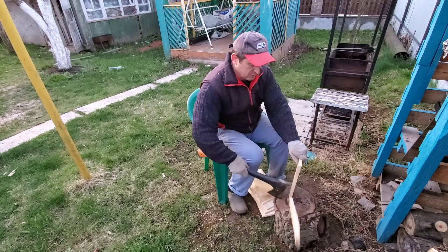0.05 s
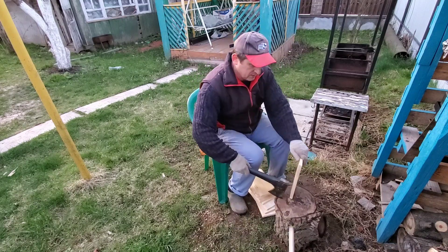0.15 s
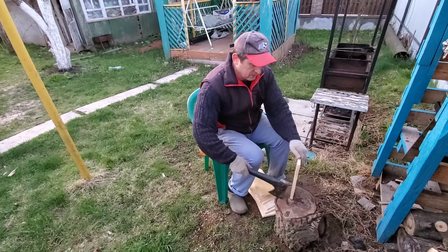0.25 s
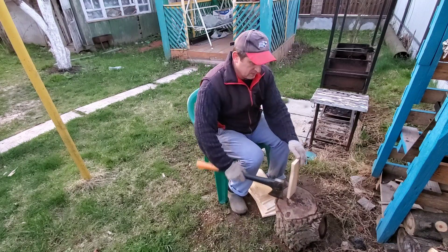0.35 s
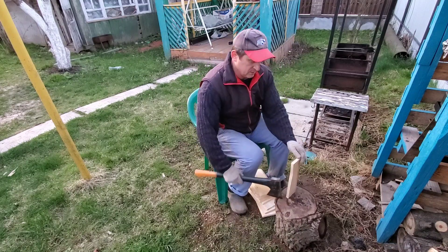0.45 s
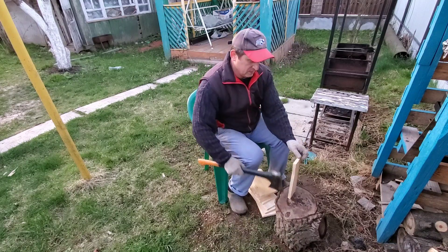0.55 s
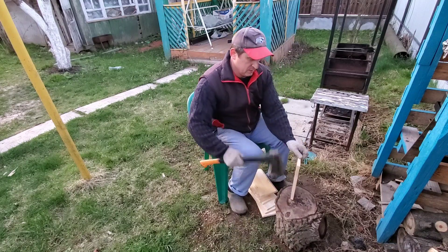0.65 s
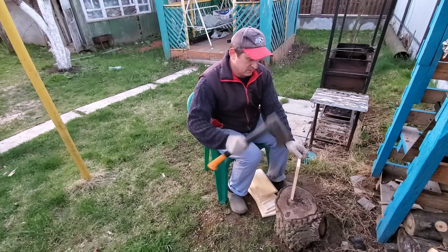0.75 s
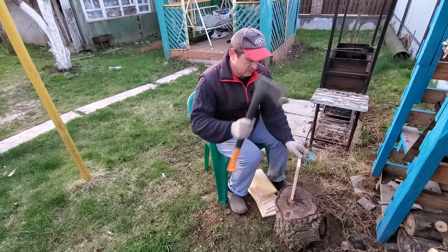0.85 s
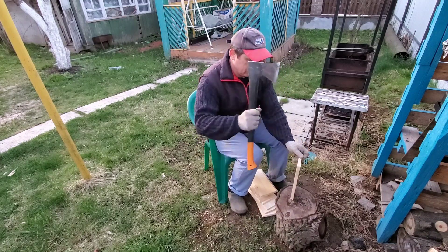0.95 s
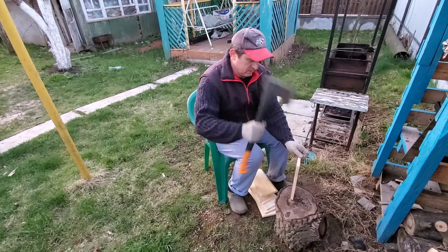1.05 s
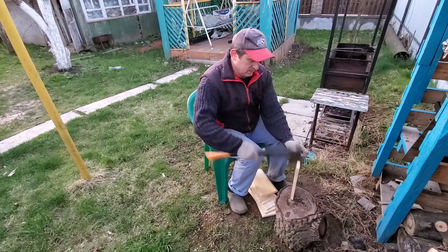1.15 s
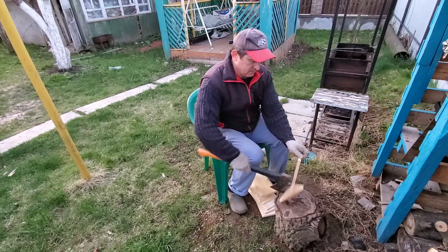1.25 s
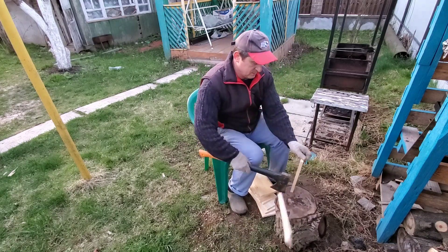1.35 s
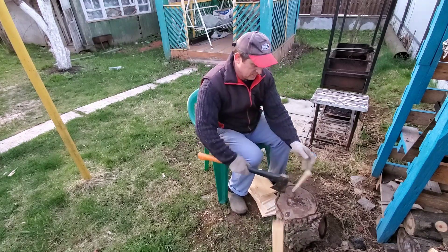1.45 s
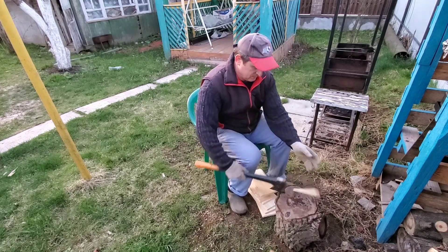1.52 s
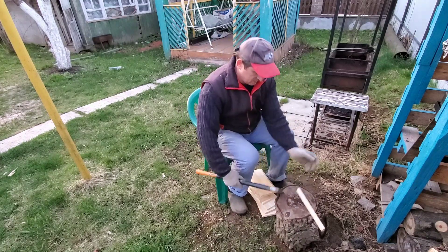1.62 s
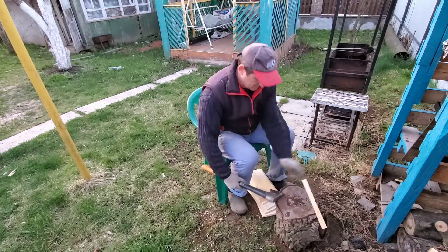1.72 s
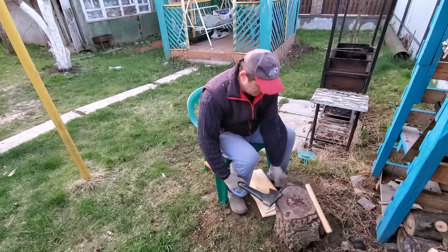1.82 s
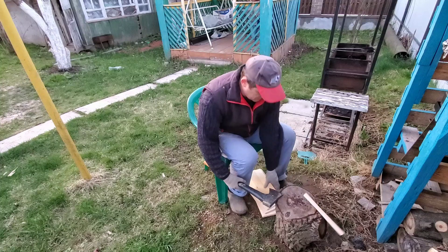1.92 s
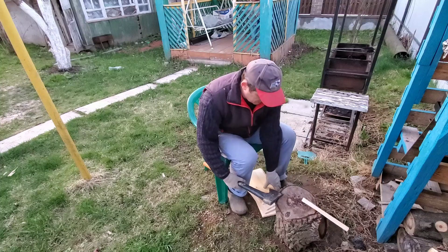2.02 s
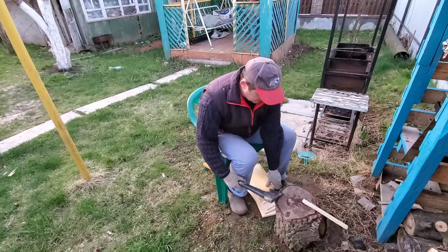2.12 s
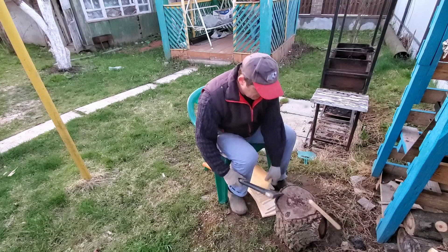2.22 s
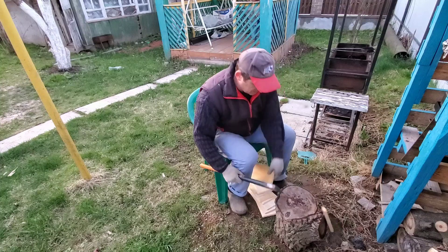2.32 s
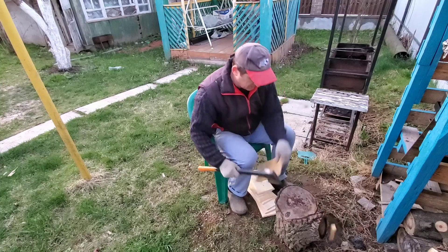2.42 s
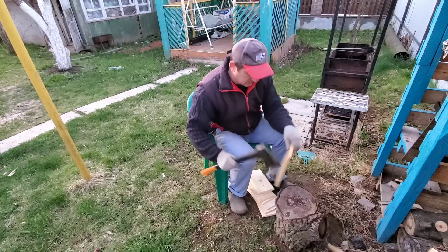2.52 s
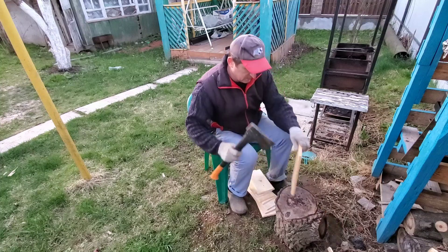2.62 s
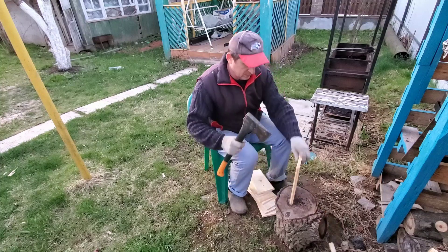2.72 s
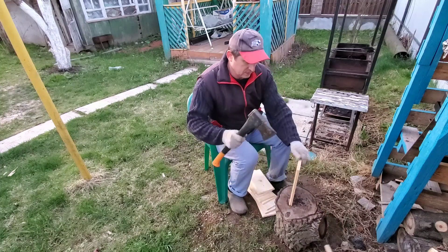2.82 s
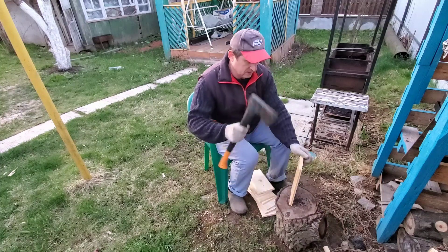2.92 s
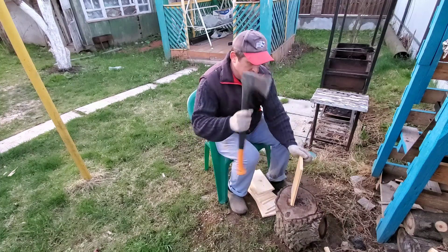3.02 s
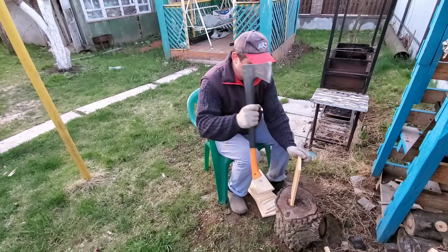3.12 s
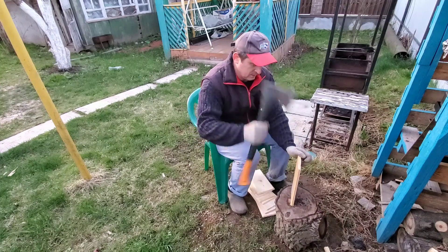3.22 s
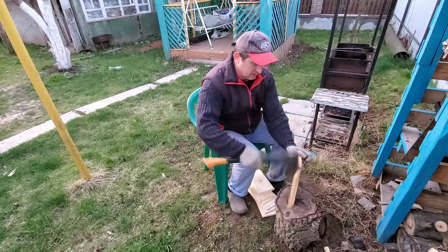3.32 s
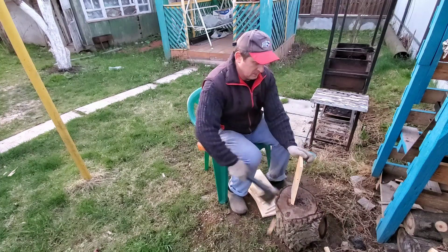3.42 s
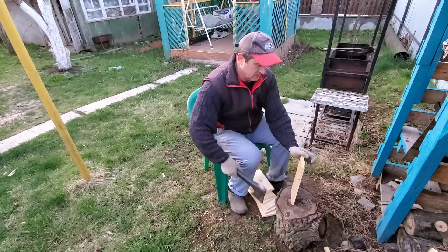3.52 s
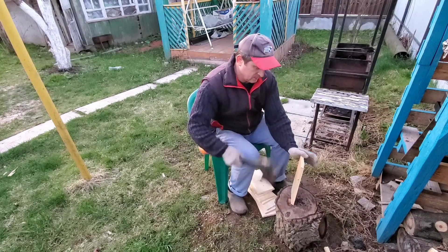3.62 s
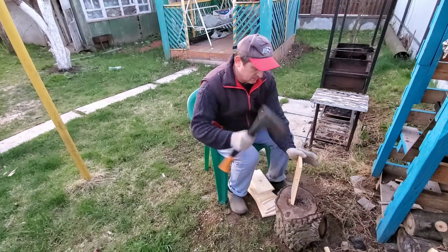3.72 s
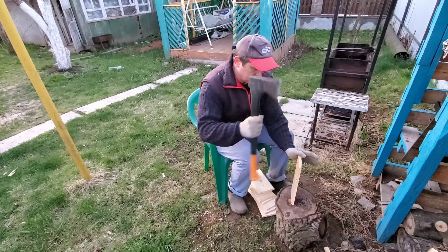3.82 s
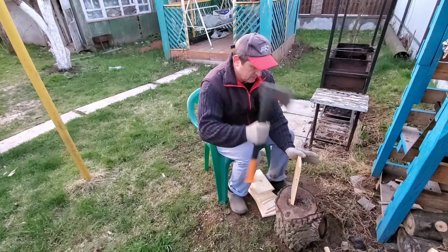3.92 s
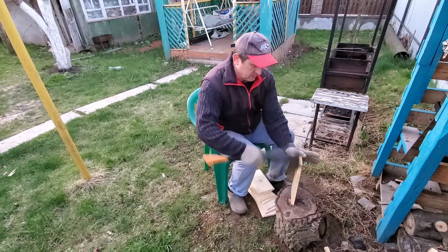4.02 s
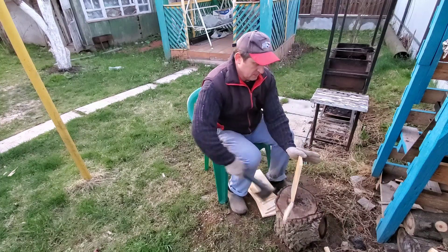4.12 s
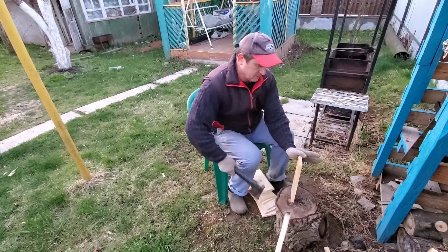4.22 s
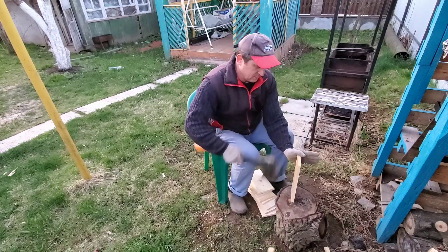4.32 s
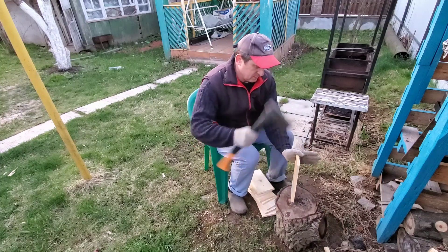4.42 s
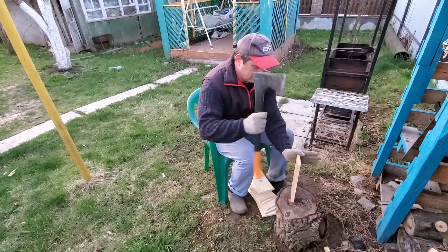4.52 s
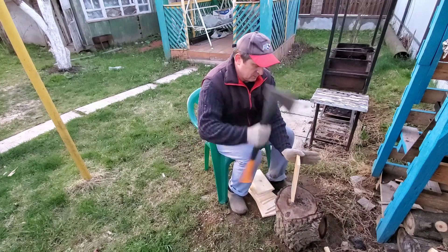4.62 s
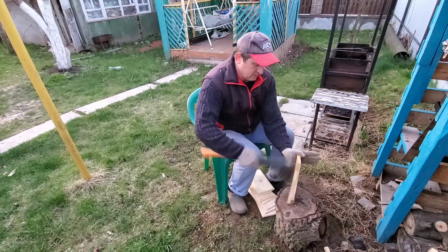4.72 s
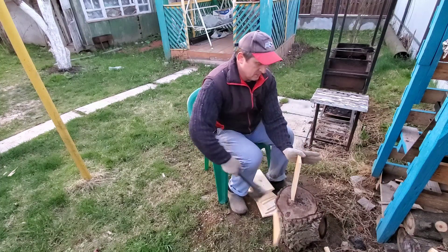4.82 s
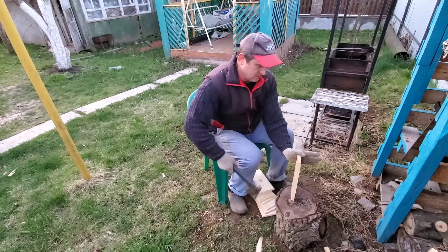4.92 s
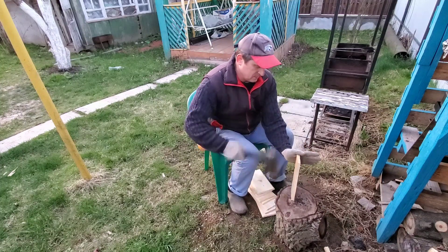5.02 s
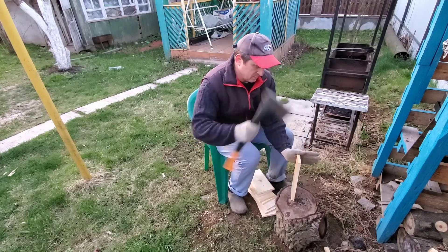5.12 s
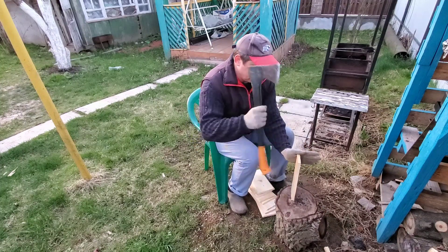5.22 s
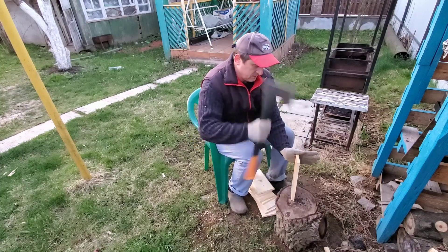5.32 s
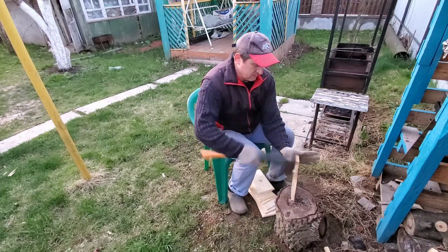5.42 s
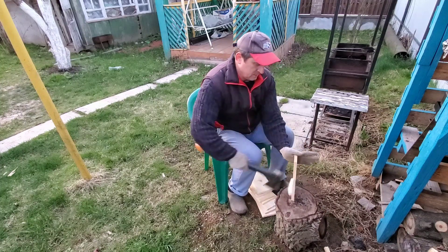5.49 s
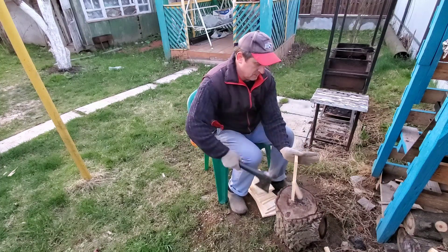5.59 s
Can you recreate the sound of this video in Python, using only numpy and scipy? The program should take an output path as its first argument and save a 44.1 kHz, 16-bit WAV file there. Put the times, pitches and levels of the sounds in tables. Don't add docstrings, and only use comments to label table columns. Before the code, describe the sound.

A quiet garden with a very low distant town hum, faint leaf and sleeve rustle and far birds, captured by a close stereo microphone. At 0.04 s a hatchet cracks into a dry stick, fibres snapping, followed by a heavy stump thud at 0.1. Faint whistles and brushing fill the pause. A weaker chop comes at 1.26 with a solid thud at 1.33; light pieces land at 1.6 and 1.72, then a bright double wooden clatter at 1.84-1.91. Soft glove scrapes and bird calls follow, with a knock at 2.85 and a short chirp at 2.92. The loudest, crackling chop hits at 3.42, another with fuller bass at 4.12, and a split piece knocks and bounces at 4.4-4.5. Sharp chops at 4.80 and 5.51 end it, the last with a quick second knock. Wood rings briefly; fences return very short echoes.

```python
import sys
import numpy as np
from scipy import signal
from scipy.fft import rfft, irfft, next_fast_len
from scipy.io import wavfile
from scipy.ndimage import uniform_filter1d, map_coordinates

SR = 44100
rng = np.random.default_rng(int(sys.argv[2]) if len(sys.argv) > 2 else 0)


def attenuation_scalar(level_db):
    decades = np.asarray(level_db, float) / 20
    return 10 ** decades


def to_wav(sig):
    pcm = np.clip(np.atleast_2d(sig), -1, 1) * 32767
    pcm = np.round(pcm).astype(np.int16)
    wavfile.write(sys.argv[1], SR, pcm.T)


N = 249253

# [f/Hz, likeness/0..1]
LIKENESS = [(40, 0.93), (150, 0.88), (500, 0.9), (1500, 0.6), (5000, 0.6), (15000, 0.14)]
# [f/Hz, t60/s]
YARD_FADE = [(100, .2), (500, .25), (3000, .26), (8000, .24), (15000, .23)]
# [f/Hz, left minus right/dB]
LEFT_TILT = [(150, -2), (400, 0), (1000, 2), (3000, 3.5), (8000, 4), (15000, 2.5)]

# [f/Hz, level/dB]
TOWN_COLOUR = [(12, -42), (20, -19.5), (48, 1.5), (75, 3.5), (93, -5), (146, -15.5), (225, -24.5),
               (498, -37), (1500, -40), (1950, -76.5), (3300, -120)]
# [f/Hz, level/dB]
LEAF_COLOUR = [(350, -30), (600, 2), (1140, -13), (1310, -7.5), (1550, -5), (4070, -1), (5530, -3.5),
               (6410, 2.5), (7950, -20), (9000, -20), (11700, -43.5), (19800, -120)]
# [f/Hz, level/dB]
SLEEVE_COLOUR = [(4120, -39.5), (7000, -19.5), (8380, -16), (9460, -9.5), (14900, -2), (16500, -28.5)]
# [t/s, level/dB]
MOVEMENT = [(0.0, -69), (0.14, -77.5), (0.63, -72.5), (1.01, -81.5), (1.87, -71.5), (2.05, -76),
            (2.63, -76), (2.77, -69), (3.19, -83.5), (3.38, -85.5), (3.62, -71.5), (3.81, -79.5),
            (4.23, -72.5), (4.55, -77.5), (5.02, -75), (5.32, -79), (5.54, -79), (5.65, -57.5)]

# [start t/s, end t/s, first f/Hz, last f/Hz, level/dB]
SONG_NOTES = [(0, .05, 2980, 2880, -64), (5.13, 5.21, 4600, 3500, -83), (.2, .34, 2720, 2170, -74),
              (.34, .42, 2280, 2170, -77), (.53, 0.61, 2890, 2830, -79), (.7, .785, 3000, 2915, -77),
              (.68, .78, 2360, 2200, -81), (.8, .97, 1860, 2100, -83), (.89, 0.97, 2280, 2300, -72),
              (2.315, 2.45, 4450, 2650, -72), (2.917, 2.948, 3850, 4000, -51),
              (2.66, 2.75, 4625, 3500, -79.5), (3.11, 3.303, 1600, 1397, -83)]
# [t/s, level/dB]
RISING_WHISTLES = [
    (.36, -80),
    (.615, -82),
    (.76, -80),
    (.905, -82),
]
# [start t/s, end t/s, first f/Hz, last f/Hz, level/dB]
HIGH_WHISTLES = [
    (2.555, 2.62, 8300, 8750, -68),
    (2.605, 2.71, 8780, 7600, -70),
    (4.005, 4.075, 8350, 8610, -62.5),
    (4.06, 4.125, 8800, 8500, -62),
    (5.075, 5.25, 8600, 7450, -75),
]
# [start t/s, end t/s, first f/Hz, last f/Hz, level/dB]
HARSH_CHIRPS = [
    (.473, .49, 6400, 6100, -63.5),
    (1.05, 1.075, 6400, 6140, -60.5),
    (1.07, 1.108, 6852, 4966, -69),
    (1.07, 1.1, 4850, 3870, -77),
    (3.36, 3.395, 3264, 3125, -61),
    (3.365, 3.395, 6587, 5230, -68.5),
    (3.365, 3.41, 1653, 1580, -74),
]
# [start t/s, end t/s, first f/Hz, last f/Hz, level/dB]
NASAL_CALLS = [
    (2.532, 2.575, 2135, 1960, -66),
    (2.585, 2.62, 2150, 2110, -80),
    (4.0, 4.04, 2109, 2028, -66),
    (4.045, 4.075, 2113, 2040, -74.5),
]
NASAL_OVERTONES = [0, 6, 4, -16, -20, -14, -10]

# [t/s, peak level/dB, treble level/dB, fade t60/s, bass level/dB]
CHOP_HITS = [
    (0.0432, -7, -19, 0.021, -13),
    (1.2572, -13, -25, 0.045, -18),
    (3.4196, -5, -20, 0.044, -20),
    (4.122, -10.5, -15, 0.044, -6),
    (4.8035, -6.5, -16, 0.04, -19),
    (5.5105, -9.5, -21, 0.037, -20),
]
# [level/dB, t60/s]
CHOP_TAILS = [
    (-14, .3),
    (-12, .32),
    (-15, .32),
    (-15, .25),
    (-15, .28),
    (-11, .32),
]
# [length/s, first f/Hz, last f/Hz, opening resonance level/dB]
SPLITS = [
    (.004, 2300, 2600, -6),
    (.012, 1500, 3200, -2),
    (.012, 1300, 2100, -7),
    (.01, 4000, 3500, -4),
    (.012, 3100, 2350, -7),
    (.011, 1300, 3200, -1),
]
# [t/s, f/Hz, level/dB]
EDGE_BITES = [
    (.0428, 900, -20),
    (1.2555, 900, -24),
    (3.4175, 600, -20),
    (4.1208, 750, -16),
    (4.8017, 800, -9),
    (5.5088, 1100, -17),
    (5.5372, 950, -10),
]
# [t/s, level/dB]
FIBRE_SNAPS = [(.0438, -9), (.0458, -11), (.0486, -17), (.0512, -15), (.0536, -19), (.062, -24),
               (1.2594, -16), (1.2619, -14), (1.2673, -14), (1.2698, -18), (3.4199, -8), (3.4233, -8),
               (3.4254, -10), (3.428, -10), (3.43, -10), (3.4338, -12), (3.4408, -17), (4.1266, -15),
               (4.1281, -15), (4.1304, -14), (4.1359, -20), (4.1408, -21), (4.8053, -12), (4.8083, -7),
               (4.8117, -12), (4.8138, -12), (4.8162, -15), (4.8207, -17), (4.829, -21), (5.5113, -13),
               (5.5133, -10), (5.5167, -12), (5.5198, -14), (5.526, -18)]
# [f/Hz, level/dB]
FIBRE_COLOUR = [(88, -38), (150, -10), (972, -7.5), (1590, -14), (2500, -9), (3850, -9), (6900, -5.5),
                (7700, -11.5), (10500, -10), (14700, -2.5), (15600, -12), (16500, -45)]

# [t/s, peak level/dB, f/Hz, ground shake level/dB]
BLOWS = [(0.095, -5.5, 484, -23.5), (0.344, -37, 163.4, 5), (0.539, -52, 170, -6),
         (1.254, -22.5, 512.5, -27.5), (1.3275, -9, 468, -19), (1.609, -31.5, 183, -5),
         (1.723, -29.5, 503, -10), (1.9085, -16.5, 600, -36), (1.918, -28, 420, -20),
         (2.089, -47.5, 286, -14), (2.403, -55, 462, -14), (2.59, -49.5, 183.4, -0.5),
         (2.753, -51, 279.8, -6), (2.849, -19, 506, -28), (3.416, -32.5, 551, -11),
         (4.053, -43.5, 210, -12), (4.121, -34, 534, -10), (4.202, -25, 231, -21.5),
         (4.801, -20, 541.4, -19.5), (5.319, -48, 598, -10), (5.534, -26.5, 535, -9)]
# [t/s, f/Hz, level/dB, t60/s]
BOARD_RINGS = [(1.312, 1179, -27, 0.2), (1.87, 3900, -38, .12), (1.82, 2870, -48, .08),
               (2.139, 2610, -70, .6), (2.86, 2030, -38, 0.13), (2.86, 700, -40, .17),
               (2.853, 3500, -42, .08), (2.853, 2600, -40, .09), (2.888, 750, -45, .15),
               (1.316, 2800, -37, .12), (1.302, 3400, -34, .06), (1.612, 2900, -54, .16),
               (4.742, 1600, -52, .06), (3.44, 1900, -42, .3), (4.317, 990, -54, .1),
               (1.73, 1448, -41, 0.17), (1.857, 1179, -22, 0.16), (1.8439, 2864, -16, 0.09),
               (1.8478, 2285, -14, 0.044), (3.438, 861, -26, 0.17), (3.438, 1141, -36.5, 0.17),
               (4.416, 1179, -27, 0.2), (4.418, 1055, -32, .15), (4.414, 2400, -28, .08),
               (4.414, 2960, -33, .1), (4.49, 2250, -33, .06), (4.49, 2900, -37, .08),
               (5.313, 2400, -48, .15), (5.325, 1350, -52, .12), (5.48, 1370, -50, .15),
               (5.477, 2400, -55, .12), (4.745, 1350, -48, .15), (4.165, 760, -40, .15),
               (4.469, 1180, -31, .11), (4.744, 2485, -41, 0.07), (4.82, 904, -33, 0.35),
               (4.81, 1114, -38, 0.29), (4.811, 2400, -31, 0.18)]
# [t/s, f/Hz, level/dB, t60/s]
CHAIR_HUMS = [
    (.11, 166.4, -33.5, 0.29),
    (0.55, 208, -48, .2),
    (1.34, 170, -32, 0.256),
    (3.766, 227.3, -45, 0.19),
    (5.121, 222.3, -46, 0.18),
]

# [t/s, t60/s,
# level/dB, centre f/Hz, width/octaves]
SOFT_BRUSHES = [(.483, 0.74, -62, 5800, .3), (.7, 0.22, -66, 4500, .8), (0.895, 0.12, -65, 6930, 1.9),
                (1.05, 0.34, -60, 6000, 0.3), (1.805, 0.15, -57.5, 6400, 0.31),
                (2.25, 0.35, -58, 4800, 1.1), (2.255, .5, -66, 1300, .8), (2.91, 0.29, -53, 3300, .9),
                (3.1, .3, -62, 5480, .6), (3.35, 0.2, -61, 3880, 1.1), (3.81, 0.35, -55, 4400, 0.45),
                (3.985, 0.3, -62, 6500, 0.3), (2.27, .5, -66, 2600, .06), (1.48, .2, -62, 10000, .8),
                (2.1, .4, -68, 5100, .12), (2.26, .2, -60, 6300, .3), (2.36, .3, -66, 3000, .4),
                (1.05, .2, -62, 4500, .3), (4.73, 0.15, -66, 4970, 2.13), (4.5, .9, -64, 4300, .06),
                (4.66, .9, -72, 6400, .03), (4.58, .6, -72, 1600, .08), (2.74, .25, -62, 13000, .5),
                (2.845, .6, -65, 12500, .6), (3.745, .4, -57, 12000, .6), (3.995, .5, -65, 13500, .4),
                (2.255, .4, -66, 13000, .4), (4.125, .25, -34, 4100, .3), (1.262, .3, -38, 9000, .5),
                (3.425, .2, -34, 6600, .1)]
# [t/s, t60/s, level/dB, centre f/Hz,
# width/octaves]
BARK_GRATES = [(1.61, 0.16, -53, 3500, .8), (1.724, 0.08, -39, 3500, 1.1), (1.845, 0.065, -27, 4500, 0.53),
               (2.136, 0.54, -65, 1298, 0.85), (2.753, 0.09, -54, 3500, 1.4), (2.85, 0.11, -45, 3260, 0.64),
               (2.915, 0.15, -51, 5200, 0.15), (2.922, .08, -58, 7000, .12), (2.945, .25, -56, 2700, .2),
               (1.289, .05, -28, 500, .6), (1.303, .06, -26, 550, .6), (1.372, .07, -37, 700, 1),
               (1.378, .15, -53, 5500, .25), (3.817, .1, -53, 4000, .2), (1.724, .03, -40, 7000, .15),
               (5.313, .09, -53, 6400, .1), (5.322, .12, -48, 1500, .9), (4.725, .1, -62, 6400, .05),
               (4.742, .15, -58, 4200, .2), (2.976, 0.07, -55, 4530, 0.7), (3.765, 0.1, -55, 4500, 1.5),
               (3.75, .15, -57, 6700, .15), (4.201, 0.03, -31, 1800, 1.7), (4.408, 0.035, -24, 2200, 0.45),
               (4.488, 0.05, -39, 2400, 0.6), (5.311, 0.156, -60, 4000, 0.744), (5.11, .09, -60, 4000, 1.3),
               (.533, .2, -61, 4500, 1.2), (5.474, .04, -51, 6300, .1), (5.474, .08, -58, 4300, .15),
               (1.84, .15, -40, 400, .8), (1.82, .08, -52, 1200, .4), (2.4, .06, -57, 1100, 1),
               (2.08, .05, -56, 1600, .8), (1.611, .15, -60, 10000, .8), (1.724, .06, -55, 10000, .6),
               (4.317, .12, -55, 1100, .5), (4.41, .15, -50, 5500, .3), (2.533, .05, -62, 6500, .3),
               (.342, .06, -62, 8000, 1.2), (4.803, .12, -20, 5800, .4), (1.846, .05, -41, 11960, .5),
               (5.54, 0.05, -18, 5000, .9)]
# [t/s, peak level/dB, lowest f/Hz, t60/s, hardness/dB]
STICK_HITS = [(0.344, -57, 817, 0.025, -2), (1.289, -27, 1183, 0.08, -14), (1.303, -27, 1300, 0.04, -5),
              (1.378, -41, 1180, 0.06, -16), (1.611, -43, 1180, 0.023, 4), (1.725, -32, 1158, 0.04, -11.5),
              (1.8375, -12, 1100, 0.055, -7), (1.845, -10, 1150, 0.04, -2.5),
              (1.858, -24, 1200, 0.084, -12), (1.911, -23, 1150, 0.02, -10), (2.082, -48, 815, 0.05, -12),
              (2.139, -43, 1220, 0.03, -14), (2.241, -48, 1284, 0.035, -10.5),
              (2.8505, -19, 900, 0.03, -14), (2.853, -23, 1020, .04, -10), (4.308, -30, 901, 0.016, -28.5),
              (4.406, -11, 1141, 0.025, -7), (4.4115, -12, 1150, 0.018, -6), (4.469, -31, 1127, 0.03, -11),
              (4.489, -24.5, 1130, 0.05, -9), (4.5, -33, 1084, 0.04, -16), (4.507, -33, 1150, .04, -8),
              (4.741, -45, 998, 0.08, -12), (4.776, -51, 1040, 0.062, -14), (5.313, -50, 1150, .1, -12),
              (5.4755, -46, 900, .04, -5), (5.538, -21, 886, 0.025, -6), (5.542, -24, 1300, .03, -2)]
BENDING_RATIOS = (1.97, 2.5, 3.45)


def unit(x):
    return x / np.sqrt(np.mean(x ** 2) + 1e-20)


def noise(n):
    return rng.standard_normal(n)


def smooth_noise(n, size):
    return uniform_filter1d(noise(n), size=size)


def along(points, hz):
    f, v = np.transpose(points)
    return np.interp(np.log(hz + 1), np.log(f + 1), v)


def filtered(x, response):
    n = x.shape[-1]
    m = next_fast_len(n + 4096)
    return irfft(rfft(x, m) * response(np.fft.rfftfreq(m, 1 / SR)), m)[..., :n]


def fade(t, t60):
    return attenuation_scalar(-60 * t / t60)


def rise(t, attack):
    return 1 - np.exp(-t / attack)


def ring(t, hz, t60, attack):
    return np.sin(2 * np.pi * hz * t) * fade(t, t60) * rise(t, attack)


def band(t, hz, octaves):
    return unit(filtered(noise(len(t)), lambda f: np.exp(-(np.log2(f / hz + 1e-9) / octaves) ** 2)))


def wobble(rate):
    knots = noise(int(N * rate / SR) + 4)
    return map_coordinates(knots, [np.arange(N) * rate / SR])


def yard(x):
    hz, t = np.fft.rfftfreq(256, 1 / SR), np.arange(96) * 128 / SR
    z = noise((2, len(hz), 2 * len(t))).view(complex)
    tail = signal.istft(z * fade(t, along(YARD_FADE, hz)[:, None]), SR, nperseg=256)[1]
    tail *= rise(np.arange(tail.shape[1]) / SR, 0.0052) / np.linalg.norm(tail[0])
    delay = rng.integers(40, 700, (2, 8))
    tail[[[0], [1]], delay] += attenuation_scalar(-delay / 60) * rng.uniform(-1, 1, (2, 8))
    bass_cut = lambda f: f * f / (f * f + 300 ** 2)
    m = next_fast_len(x.shape[1] + tail.shape[1])
    return irfft(rfft(x, m) * rfft(tail, m) * bass_cut(np.fft.rfftfreq(m, 1 / SR)), m)


def add(out, s, x, wet_db, lag=None):
    x = np.broadcast_to(x, (2, x.shape[-1]))
    both = attenuation_scalar(wet_db) * yard(x)
    if lag is None:
        lag = rng.integers(1, 6)
    both[0, lag:][:x.shape[1]] += x[0]
    both[1, :x.shape[1]] += x[1]
    out[:, round(s * SR):][:, :both.shape[1]] += both


def rush(colour, patchy_db):
    z = signal.stft(noise((2, N)), nperseg=512)[2]
    patches = uniform_filter1d(smooth_noise_rows(z.shape[1:]), size=10, axis=1)
    pair = signal.istft(z * attenuation_scalar(patchy_db * unit(patches)), nperseg=512)[1][:, :N]
    turn = lambda hz: np.arccos(np.clip(along(LIKENESS, hz), -1, 1)) / 2
    mid, side = filtered(pair, lambda hz: attenuation_scalar(along(colour, hz)) * [np.cos(turn(hz)), np.sin(turn(hz))])
    return unit(np.array([mid + side, mid - side]))


def smooth_noise_rows(shape):
    return uniform_filter1d(noise(shape), size=6, axis=0)


def air():
    s, db = np.transpose(MOVEMENT)
    stir_db = np.interp(np.arange(N) / SR, s, db)
    hum = attenuation_scalar(-60 + 0.8 * wobble(3.2)) * rush(TOWN_COLOUR, patchy_db=1.2)
    leaves = attenuation_scalar(stir_db - 1.2) * rush(LEAF_COLOUR, patchy_db=3)
    sleeve_db = -82 + 1.5 * (stir_db - stir_db.mean())
    sleeves = attenuation_scalar(sleeve_db) * rush(SLEEVE_COLOUR, patchy_db=2.5)
    return hum + leaves + sleeves + attenuation_scalar(-95.5) * noise((2, N))


def call(out, rows, rough, overtones, bend=1.4):
    for start, end, hz0, hz1, db in rows:
        u = np.linspace(0, 1, max(round((end - start) * SR), 128))
        tremble, flutter = smooth_noise((2, len(u)), 120)
        hz = (hz0 + (hz1 - hz0) * u ** bend) * (1 + 3 * rough * tremble)
        phase = 2 * np.pi * np.cumsum(hz) / SR
        tone = sum(attenuation_scalar(g) * np.sin((k + 1) * phase) for k, g in enumerate(overtones))
        swell = np.sin(np.pi * u ** .75) ** .7
        add(out, start, attenuation_scalar(db + 2 + 25 * flutter) * swell * tone, wet_db=-5, lag=0)


def birds(out):
    risers = [(s, s + .065, 3550, 4600, db) for s, db in RISING_WHISTLES]
    call(out, SONG_NOTES + risers, rough=.02, overtones=[0])
    call(out, HIGH_WHISTLES, rough=.008, overtones=[0, -16])
    call(out, HARSH_CHIRPS, rough=.2, overtones=[0])
    call(out, NASAL_CALLS, rough=.015, overtones=NASAL_OVERTONES, bend=3)


def bites(out, t):
    for s, hz, db in EDGE_BITES:
        add(out, s, attenuation_scalar(db + 4) * ring(t, hz, 4 / hz, .0006), wet_db=-12, lag=3)


def crackle(t, treble_db, bass_db):
    snaps = noise((3, len(t))) * attenuation_scalar(1.8 * rng.exponential(size=len(t)))
    bunches = attenuation_scalar(9 * smooth_noise(len(t), 40))
    high = lambda hz: (treble_db + 5.5) * np.clip(np.log2(hz / 3000 + 1e-9) / 2, 0, 1)
    low = lambda hz: (bass_db + 13) * np.clip(np.log2(1500 / (hz + 1)), 0, 1)
    grain = filtered(snaps * bunches, lambda hz: attenuation_scalar(along(FIBRE_COLOUR, hz) + high(hz) + low(hz)))
    own = filtered(grain[1:], lambda hz: 1.6 * hz / (hz + 1100))
    return unit(grain[0] + own)


def single_snaps(now):
    return sum(attenuation_scalar(db - 6.5 - 60 * np.abs(now - s) / .005) * (now > s)
               for s, db in FIBRE_SNAPS if now[0] < s < now[-1])


def chops(out, t):
    for hit, (wash_db, wash_t60), (tear_s, hz0, hz1, split_db) in zip(CHOP_HITS, CHOP_TAILS, SPLITS):
        s, db, treble_db, t60, bass_db = hit
        now = t + s - .0015
        clumps = attenuation_scalar(32 * smooth_noise(len(t), 160))
        down = np.minimum(t / tear_s, 1)
        run = rise(t, 0.0011) ** 2 * attenuation_scalar(-4 * down - 60 * np.maximum(t - tear_s, 0) / t60)
        sweep = np.sin(2 * np.pi * np.cumsum(hz0 + (hz1 - hz0) * down) / SR)
        split = attenuation_scalar(split_db) * run * clumps * sweep
        wash = attenuation_scalar(wash_db + 3) * fade(t, wash_t60) * rise(t, .005) * clumps
        strength = attenuation_scalar(db - 10) * (run + wash) + single_snaps(now)
        tearing = strength * crackle(t, treble_db, bass_db)
        add(out, now[0], tearing + attenuation_scalar(db - 10) * split, wet_db=-10)


def thuds(out, t):
    build = rise(t ** 2, .0011 ** 2)
    for s, db, hz, shake_db in BLOWS:
        t60 = 11 / hz
        top = ring(t, hz, t60, 0.00037)
        top += 0.34 * ring(t, 1.4 * hz, 0.83 * t60, 0.00033)
        top += 0.55 * ring(t, .55 * hz, 1.2 * t60, 0.0031)
        dust = .15 * band(t, 1.5 * hz, 1) * fade(t, 1.5 * t60)
        ground = attenuation_scalar(shake_db) * ring(t, rng.uniform(45, 80), .16, .008)
        add(out, s + 0.0025, attenuation_scalar(db + 4) * build * (top + dust + ground), wet_db=-8, lag=2)


def chair(out, t):
    for s, hz, db, t60 in CHAIR_HUMS:
        creak = .45 * band(t, 1.15 * hz, .3) * fade(t, t60) * rise(t, .006)
        add(out, s, attenuation_scalar(db) * (ring(t, hz, t60, .006) + creak), wet_db=-20)


def scuffs(out, t):
    for rows, rise_s in ((SOFT_BRUSHES, .014), (BARK_GRATES, .0025)):
        for s, t60, db, hz, octaves in rows:
            grain = attenuation_scalar(17 * smooth_noise(len(t), 60))
            swell = fade(t, t60) * rise(t ** 2, rise_s ** 2)
            add(out, s, attenuation_scalar(db) * swell * grain * band(t, hz, octaves), wet_db=-10)


def sticks(out, t):
    for s, db, hz, t60, hard_db in STICK_HITS:
        rattle = lambda share: fade(t, share * t60) * rise(t, 0.00058)
        upper_hz = hz * np.multiply(BENDING_RATIOS, 1 + 0.02 * noise(3))
        body = ring(t, hz, t60, 0.0008) + 0.98 * band(t, hz, 0.45) * rattle(0.47)
        upper = 1.1 * band(t, upper_hz[1], 0.8) * rattle(0.63)
        for f, share in zip(upper_hz, (1.2, 1.2, .2)):
            upper += share * ring(t, f, 0.85 * t60, 0.00059)
        click = .07 * band(t, 5000, .8) * rattle(.4)
        add(out, s, attenuation_scalar(db - 3) * (body + attenuation_scalar(hard_db + 3) * (upper + click)), wet_db=-13)


def board(out, t):
    for s, hz, db, t60 in BOARD_RINGS:
        warble_db = 3.5 * unit(smooth_noise(len(t), 170))
        add(out, s, attenuation_scalar(db + warble_db) * ring(t, hz, t60, 0.0025), wet_db=-16)


def ports(both):
    sides = np.array([[.5], [-.5]])
    turn = lambda hz: np.exp(-1j * .35 / (1 + (hz / 250) ** 2) * sides)
    return filtered(both, lambda hz: attenuation_scalar(along(LEFT_TILT, hz) * sides) * turn(hz))


def scene():
    out, t = np.zeros((2, N + SR)), np.arange(SR // 4) / SR
    birds(out)
    for source in (bites, chops, thuds, chair, scuffs, sticks, board):
        source(out, t)
    return ports(out)[:, :N] + air()


def band_limit(x):
    return signal.sosfilt(signal.butter(12, 16790, fs=SR, output="sos"), x)


def record(dry):
    held = dry / (1 + np.abs(dry / .9) ** 4) ** (1 / 4)
    shelf = lambda hz: attenuation_scalar(-18 * np.clip((hz - 15750) / 150 + .5, 0, 1))
    mix = filtered(held, lambda hz: (hz < 16800) * shelf(hz))
    return band_limit(mix)


dry = scene()
out = record(dry)
to_wav(out)
```